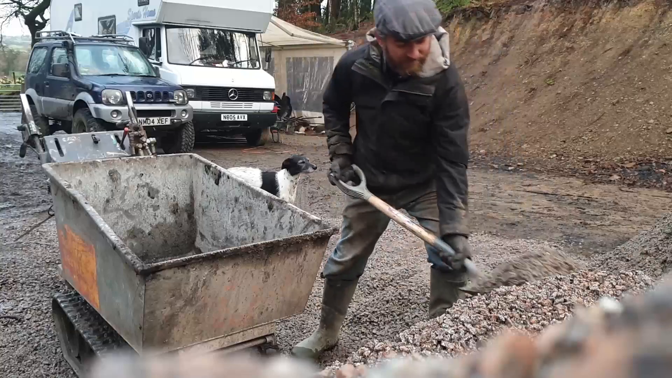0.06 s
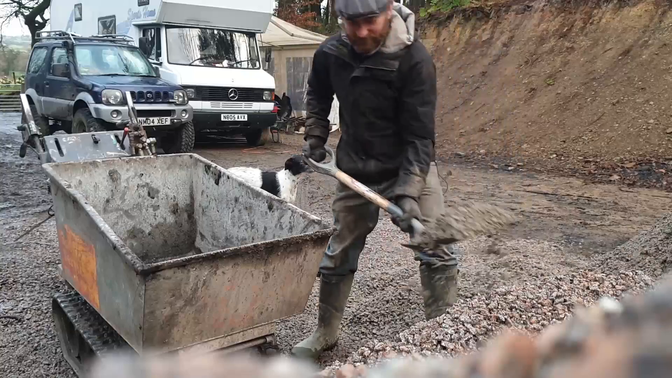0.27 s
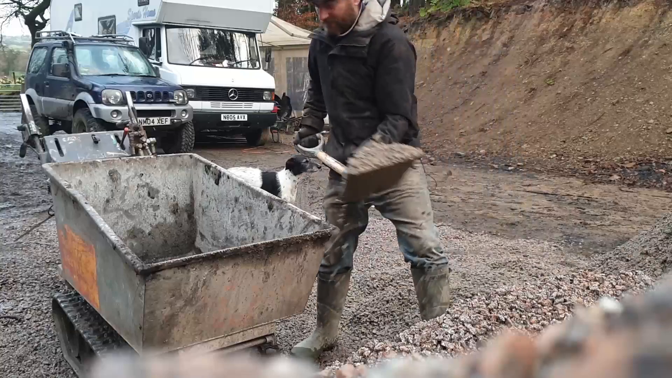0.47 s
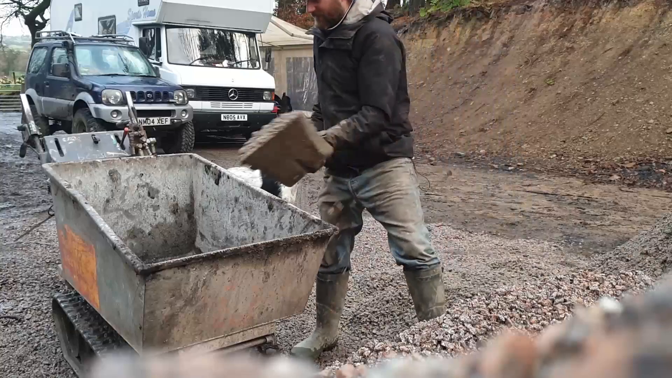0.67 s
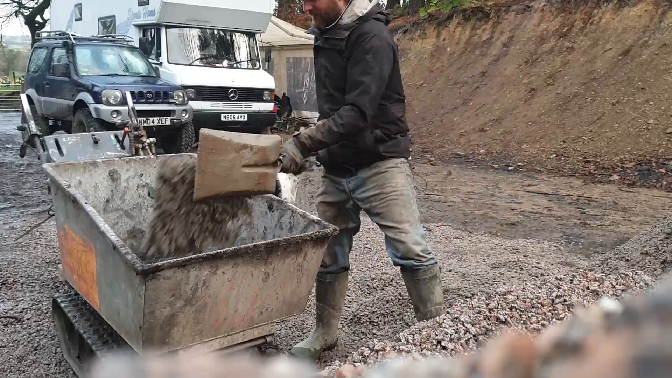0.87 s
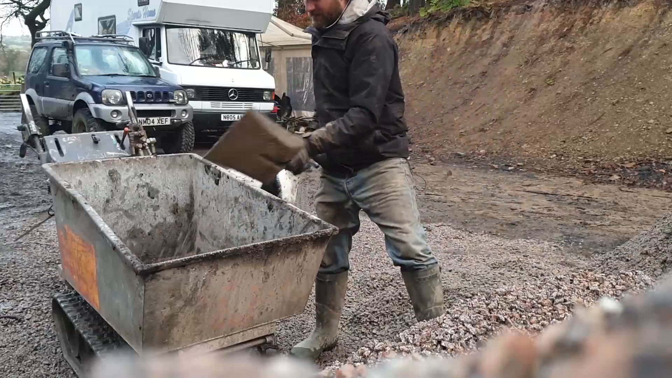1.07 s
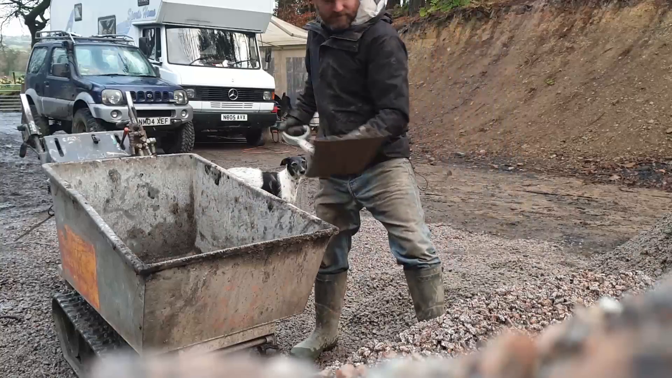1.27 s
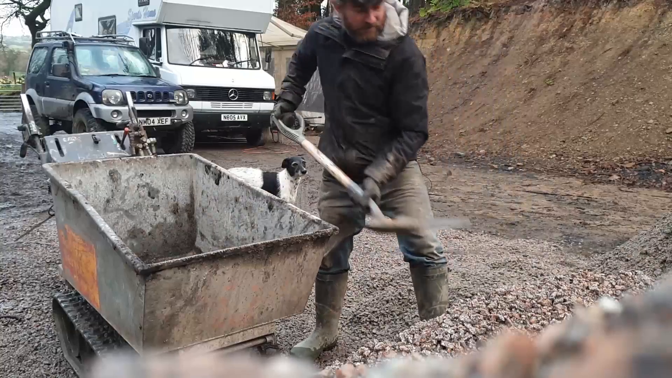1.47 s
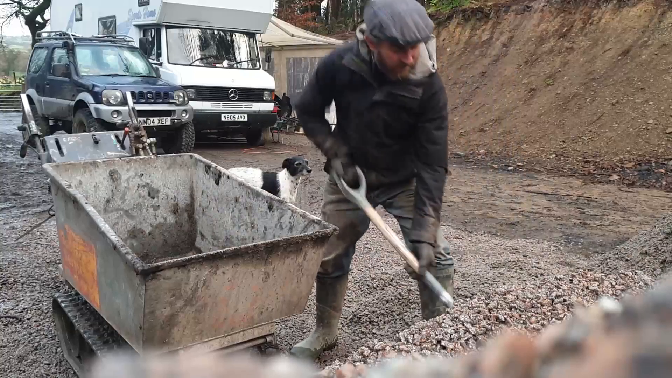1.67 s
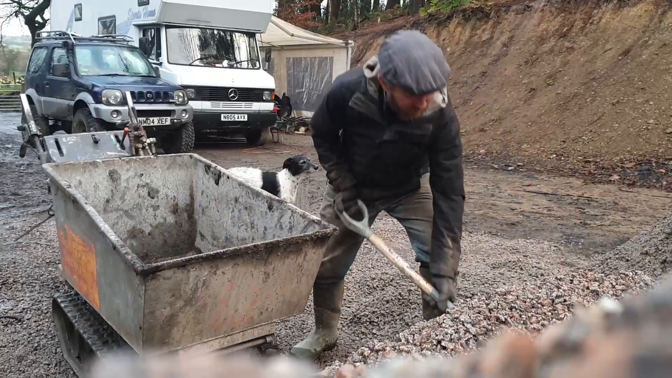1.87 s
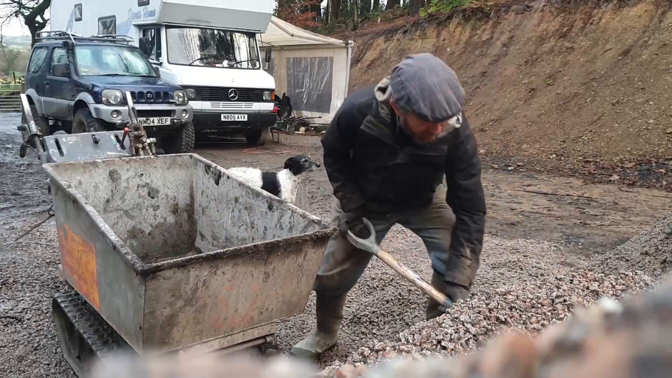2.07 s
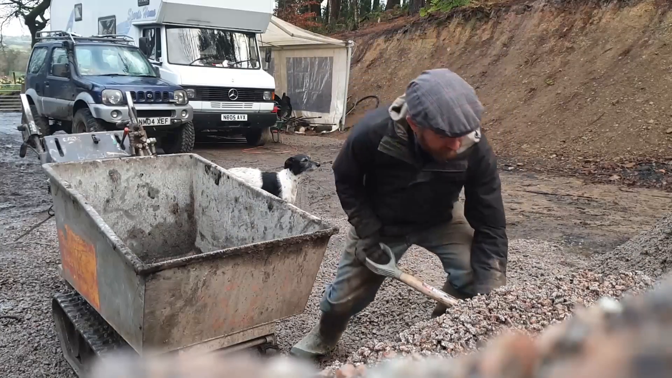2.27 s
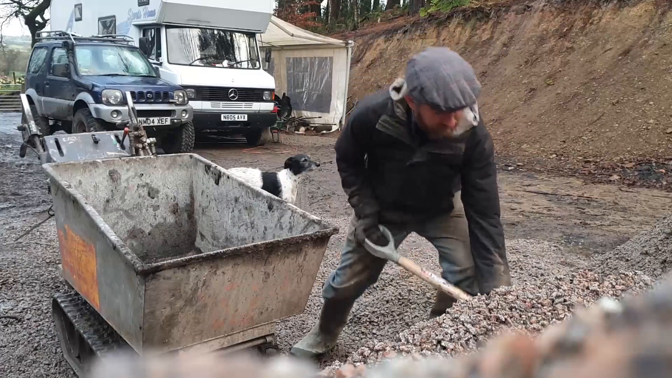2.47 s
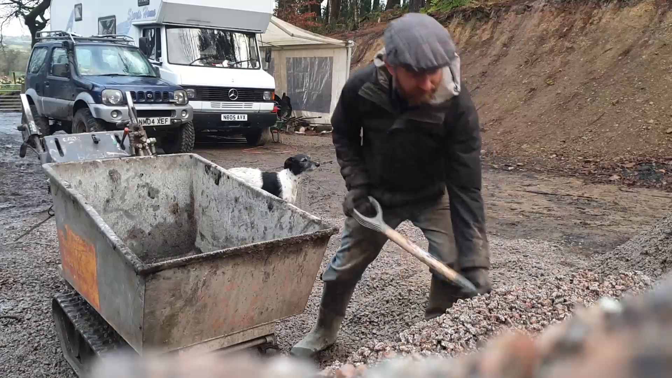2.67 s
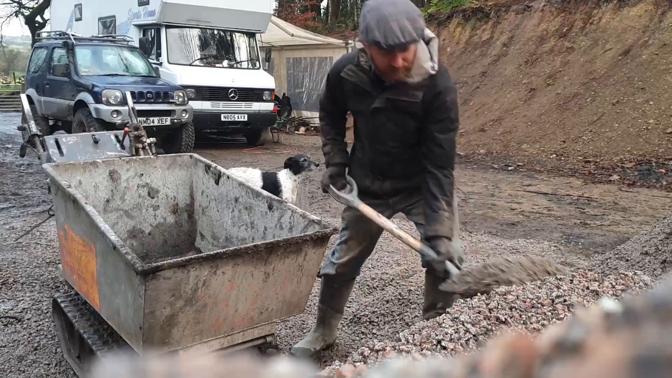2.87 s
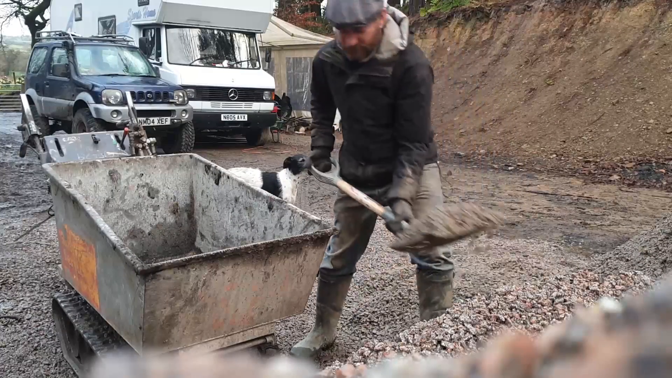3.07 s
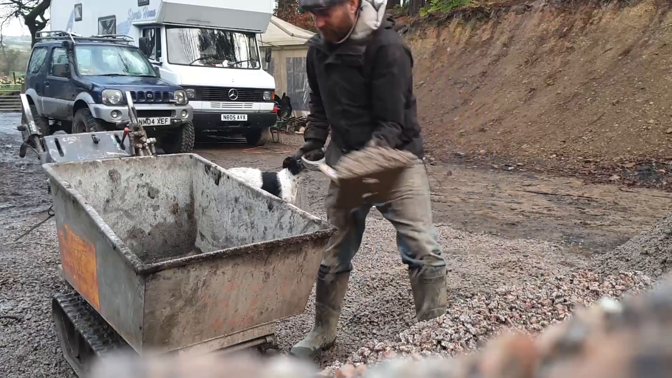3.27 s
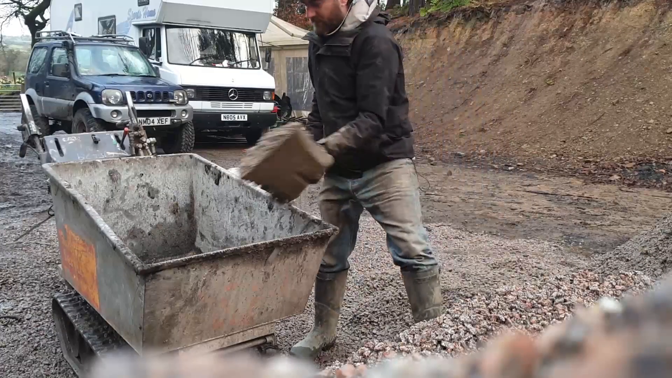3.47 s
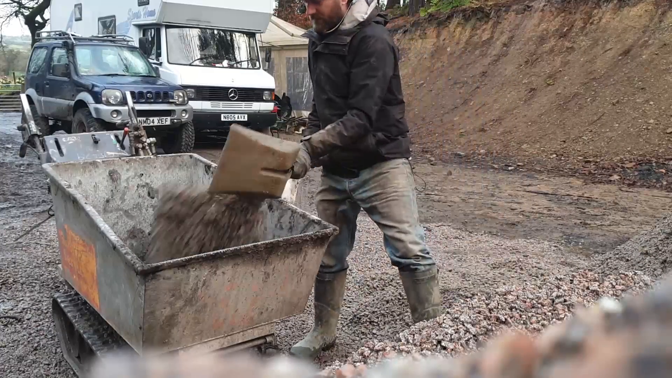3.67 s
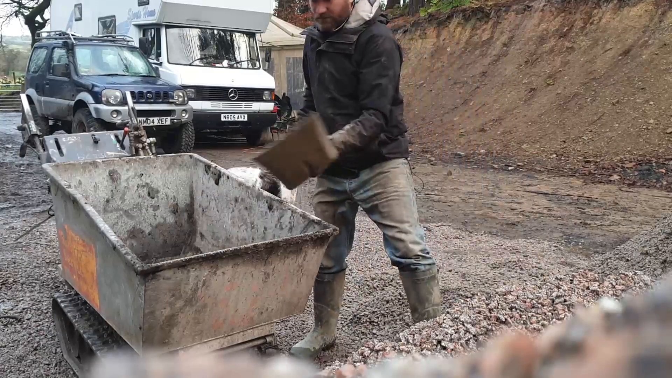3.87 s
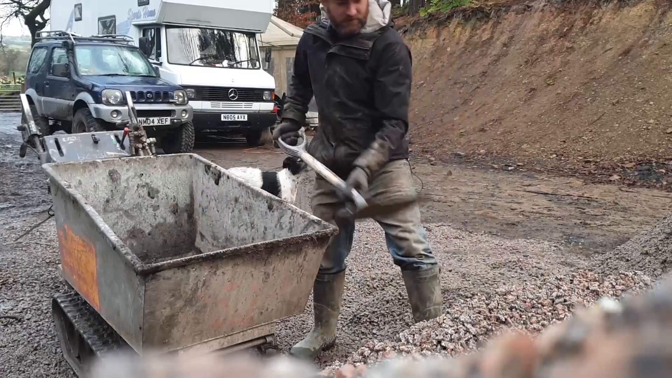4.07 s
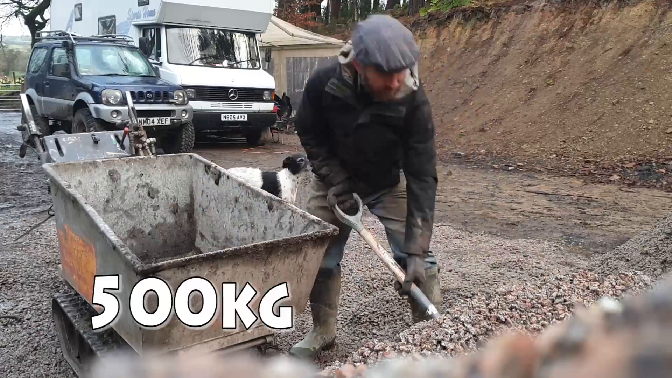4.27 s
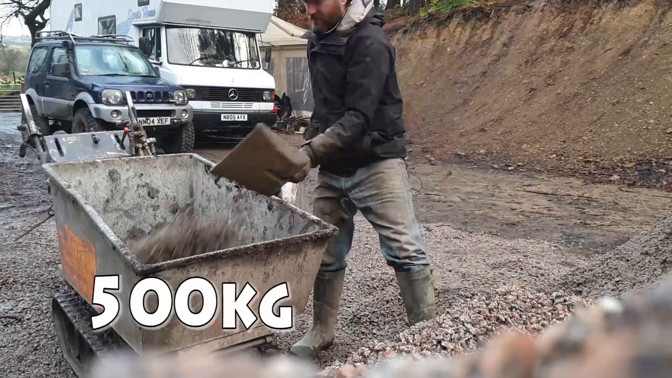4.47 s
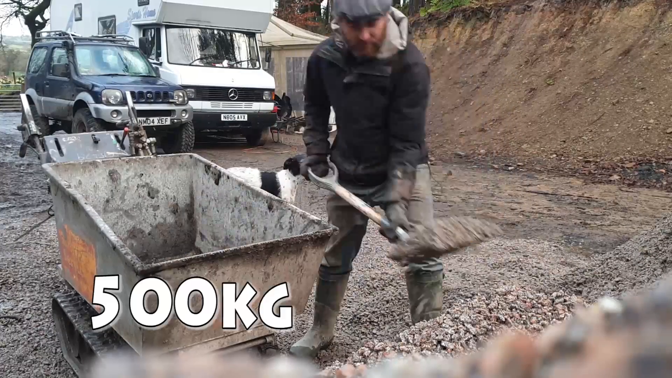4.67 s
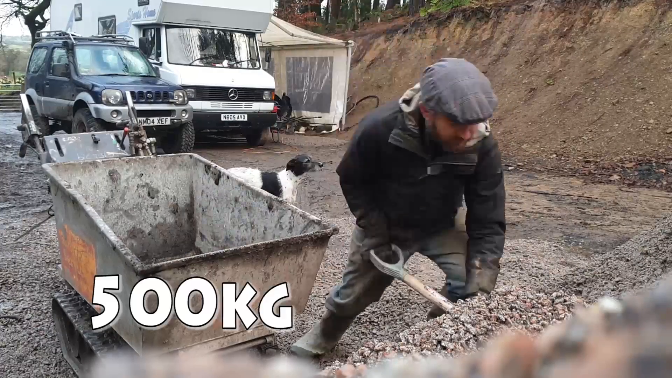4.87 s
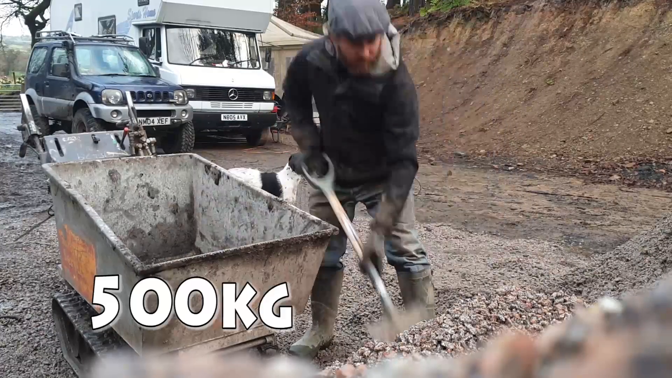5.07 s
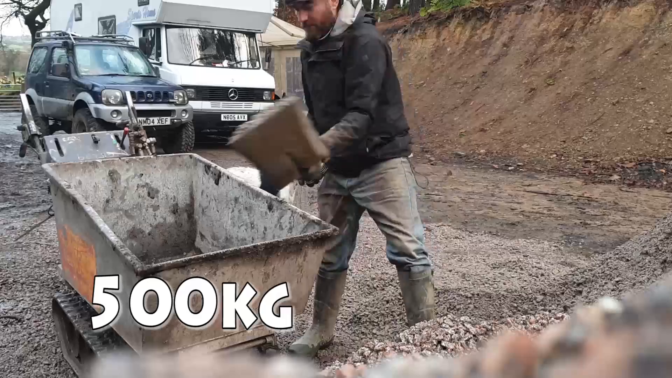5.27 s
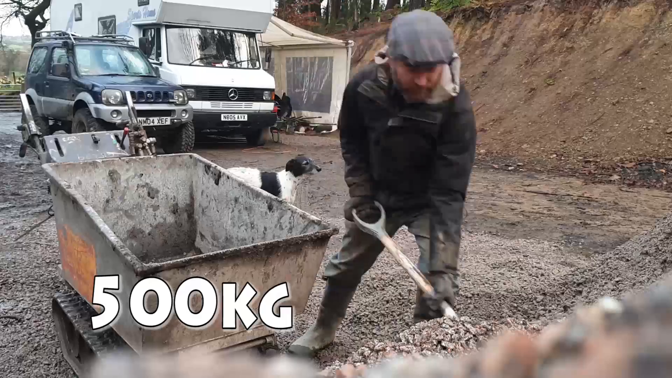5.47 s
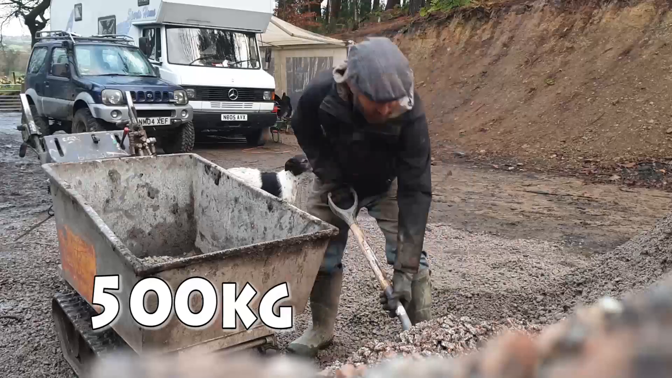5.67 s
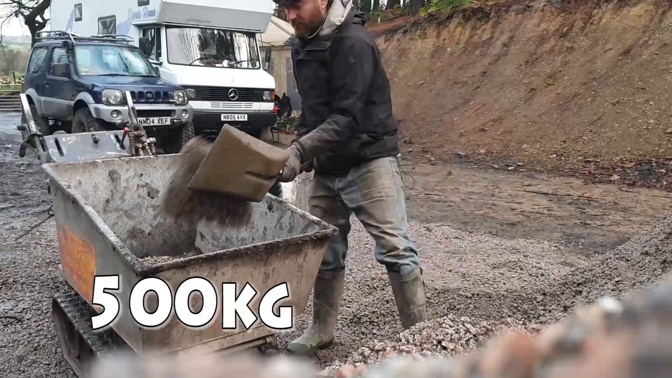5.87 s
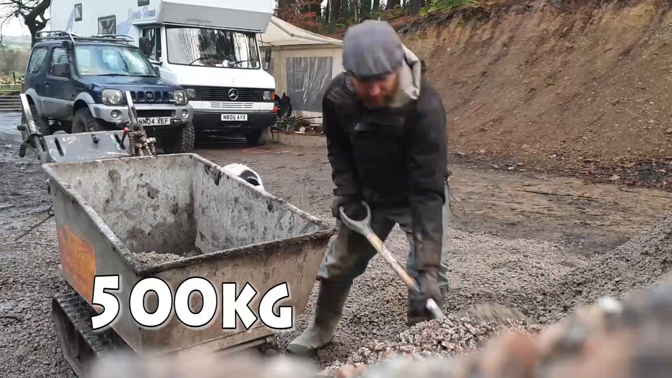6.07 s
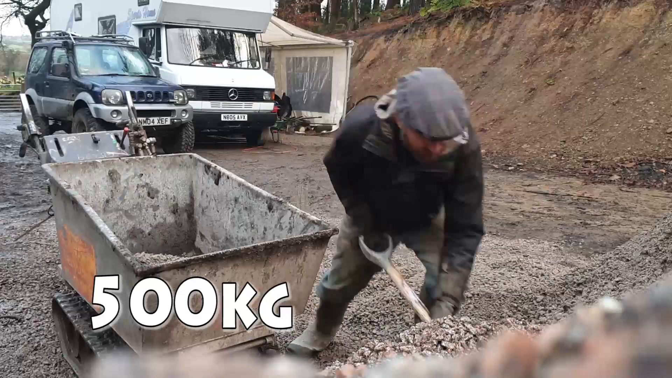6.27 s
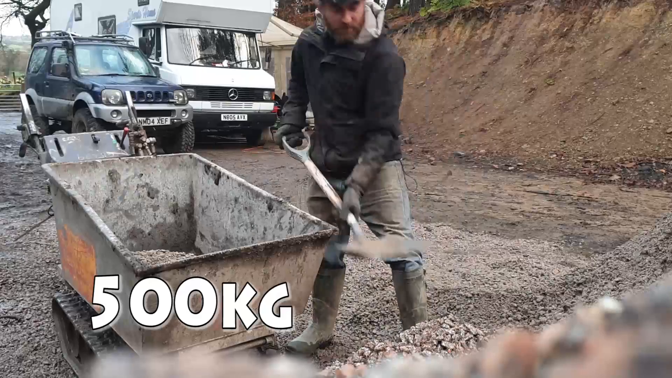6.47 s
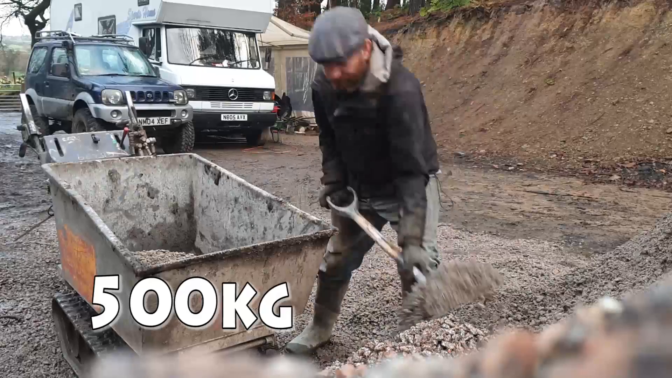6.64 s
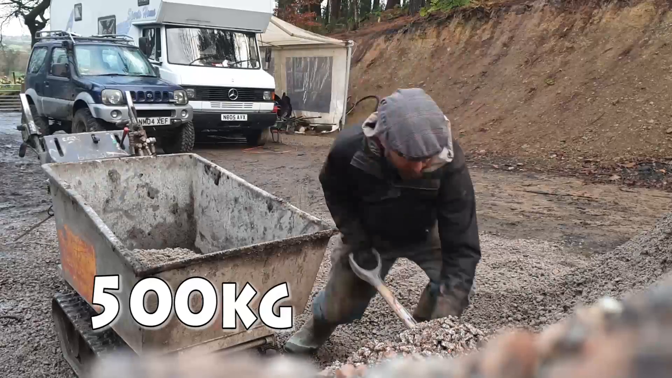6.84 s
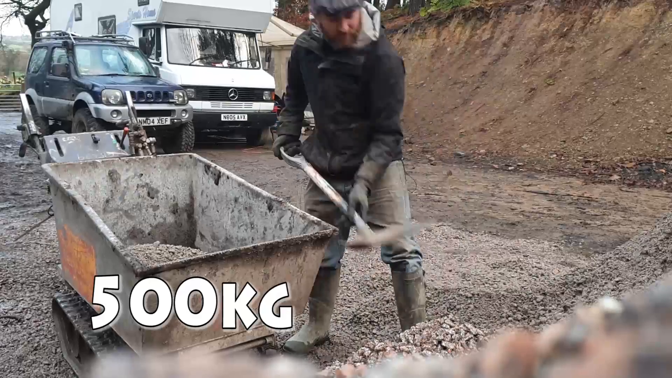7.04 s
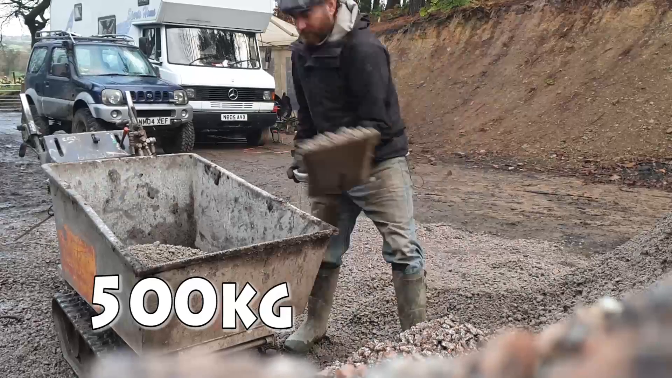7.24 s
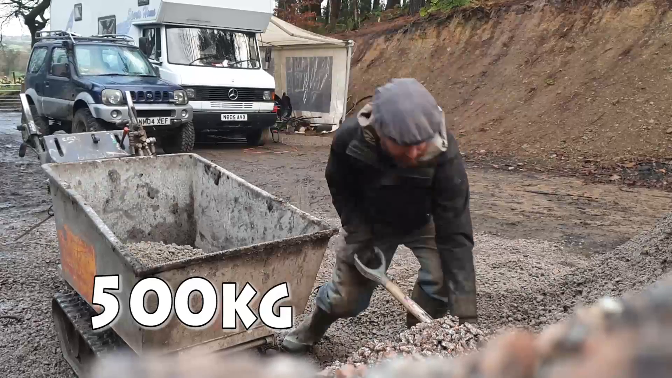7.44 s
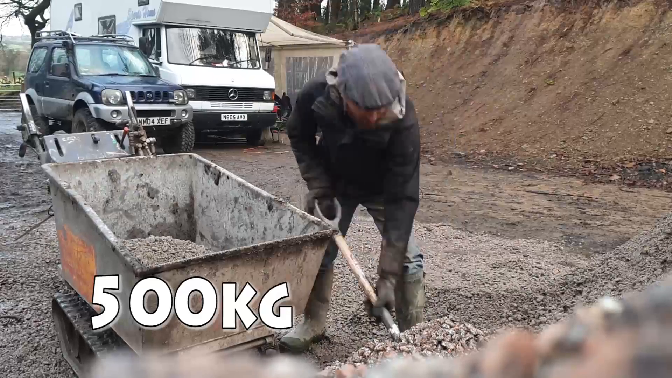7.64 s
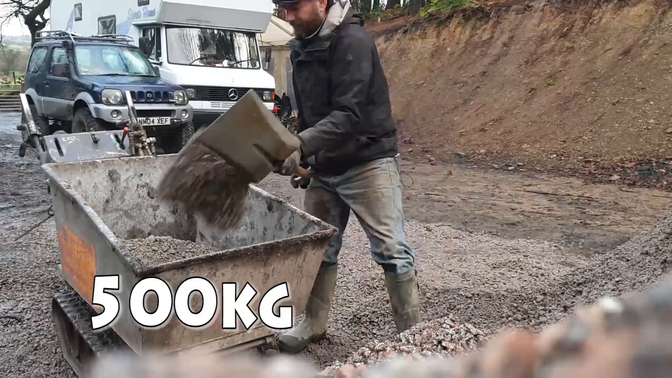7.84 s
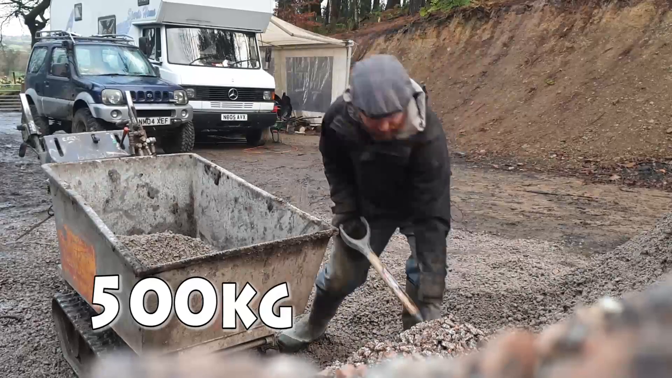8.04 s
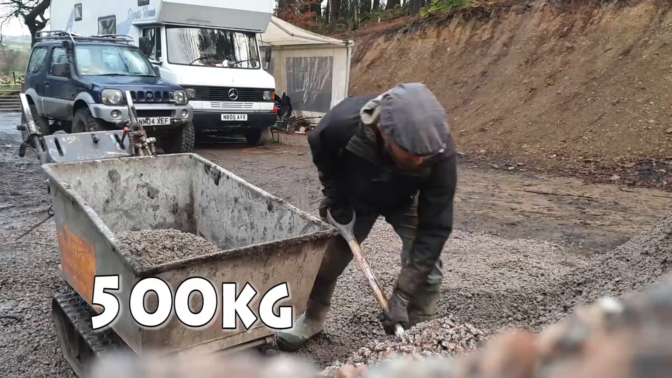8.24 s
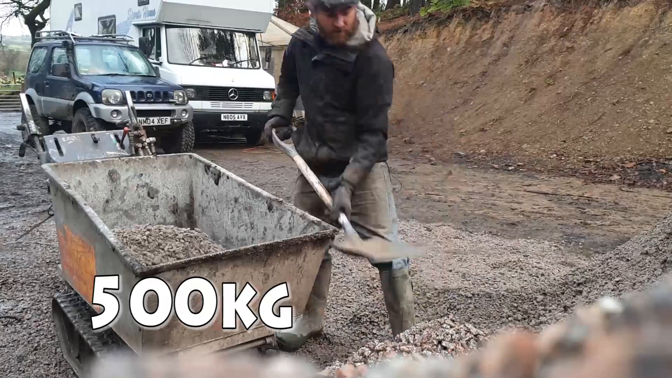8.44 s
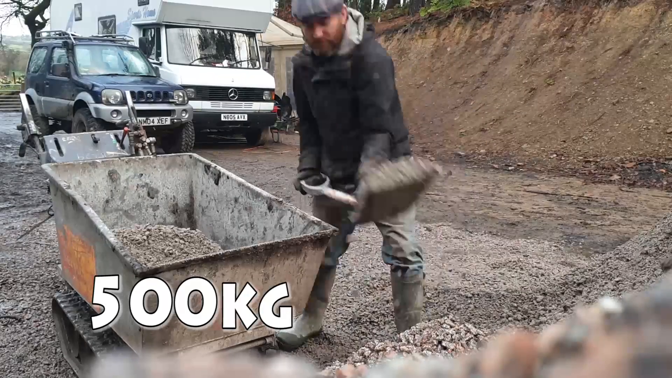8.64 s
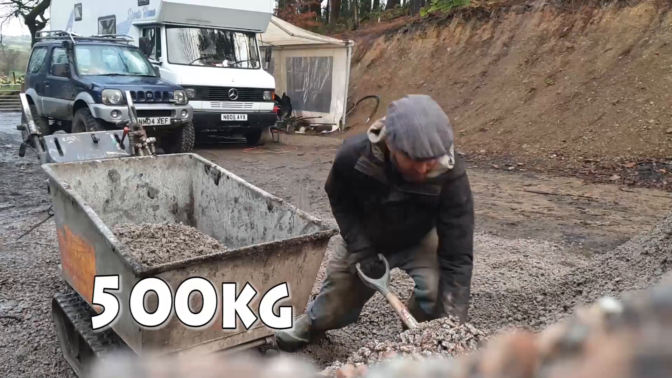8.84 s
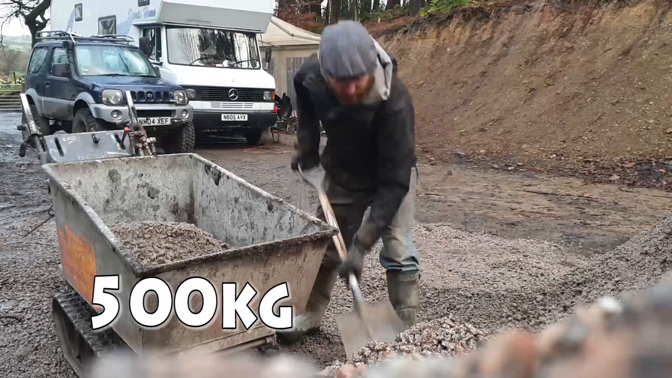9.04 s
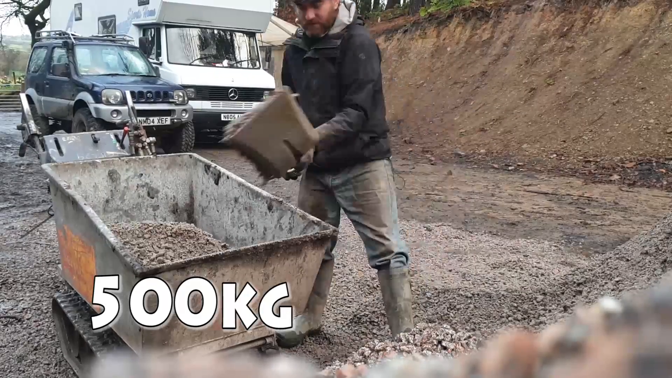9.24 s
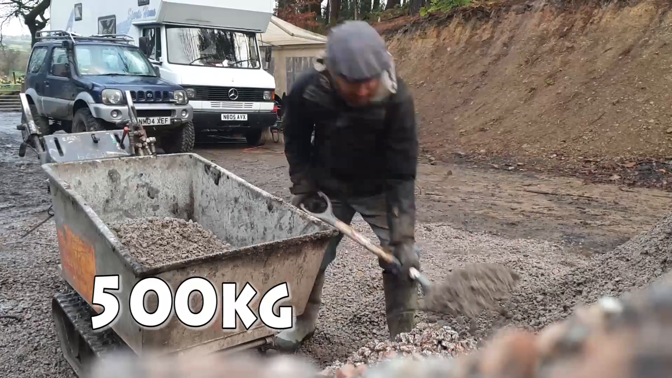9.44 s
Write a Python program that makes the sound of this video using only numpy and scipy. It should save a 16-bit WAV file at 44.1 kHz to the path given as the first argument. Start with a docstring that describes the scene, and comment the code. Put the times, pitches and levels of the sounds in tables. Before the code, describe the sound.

Outdoors, close stereo, with a soft distant traffic hum and fine grit trickling throughout. At about 0.5 s dull blade knocks sound, then at 1.0 s a load of gravel crashes into a steel skip, drumming its walls with a hollow ring that fades over loose stones. At 1.7 s the blade stabs the pile with a knock, and a gritty grinding push runs from 2.0 to 2.4 s. After a quieter pause, bright ticks fall around 3.3 s and a second load slams the skip at 3.75 s, settling by 4.2 s. From 4.3 s the strokes become about tenfold faster: crisp stab, short scrape, dry rattle and landing, roughly every 0.28 s, thinner and further left from 5 s, with a strong clack near 5.4 s. Later spills soften. From 8 s low wind buffets, with thumping puffs left at 8.6-8.9 s, then gusts right around 9.3 s until the end at 9.5 s.

```python
"""Far traffic hums and grit trickles throughout: shaped noise with wandering gains.
Gravel is shovelled from a pile into a steel skip, twice at working pace, then about tenfold faster.
In a stroke the blade stabs and pushes through the pile, then stones rattle off it and land: noise bursts.
Decaying sines give the knocks of the blade and the ring of the skip under the working-pace loads.
Near the end, wind buffets left and right: low noise with a few single puffs on the left."""
import sys
import numpy as np
from scipy import signal
from scipy.fft import rfft, irfft
from scipy.io import wavfile
from scipy.ndimage import uniform_filter1d

SR = 44100
rng = np.random.default_rng(int(sys.argv[2]) if len(sys.argv) > 2 else 0)


def put_to_file(sound):
    """Save the sound as 16-bit audio at rate SR, in the file named by the first command-line argument."""
    columns = np.atleast_2d(sound).T  # one column per channel
    safe = np.clip(columns, -1, 1)
    whole_steps = np.round(safe * 32767)
    wavfile.write(sys.argv[1], SR, whole_steps.astype(np.int16))


N = 419258
T = np.arange(N) / SR

# Levels in the tables are relative within their layer.
# traffic spectrum: (frequency [Hz], density [dB])
HUM_SPECTRUM = [(15, -35), (40, -10.5), (65, -5), (85, -7), (110, -13), (500, -24), (900, -23),
                (2000, -51.5), (3000, -85.5)]
# trickling grit, continuous: (time [s], level [dB])
TRICKLE = [(0.0, -57), (1.24, -60.5), (1.53, -65.5), (5.45, -59), (9.51, -64)]
# grains ticking off the lifted blade: (time [s], level [dB])
TICKS = [(3.1273, -49), (3.253, -49), (3.3364, -31), (3.386, -43), (3.4263, -33), (3.454, -34)]
# grit spectrum: (frequency [Hz], density [dB])
GRIT_SPECTRUM = [(900, -25.5), (1600, -9.5), (2500, -12.5), (4200, -9.5), (5200, -7), (12500, -4.5),
                 (16000, -4)]
# blade grinding through the pile at working pace: (start [s], length [s], level [dB], body [dB])
GRINDS = [(0.375, 0.26, -77.5, 13), (1.694, 0.1, -44, -1), (1.974, 0.44, -48.5, 5.5)]
# loose stones dropping alone: (time [s], level [dB], fizz [dB])
STRAYS = [(0.504, -56.5, 9.5), (0.808, -52, 1), (0.879, -38.5, -13), (1.358, -49, -16), (1.472, -48, -10),
          (1.6, -52, -28), (1.885, -52, -1.5), (3.659, -47, -3.5), (4.513, -35, -20), (4.784, -37.5, -5),
          (5.03, -41.5, -4), (5.345, -34, -6), (5.892, -56, 17.5), (6.169, -43.5, 6), (6.206, -42, 8),
          (6.746, -37, 5.5), (8.166, -42, 2)]
# working-pace loads hitting steel: (time [s], level [dB], rise [ms per 9 dB], fall [ms per 9 dB])
LOADS = [(0.628, -37.5, 7.5, 22), (0.97, -23.5, 1.7, 28), (1.005, -15.5, 14.5, 43.5), (3.535, -34, 8.5, 22),
         (3.739, -35, 6, 36), (3.769, -17, 2.5, 19), (3.831, -20, 13.5, 22), (4.111, -32, 9, 18)]
# blade stabbing the pile: (time [s], level [dB], fall [ms per 9 dB])
STABS = [(1.687, -27, 19), (4.316, -35, 2), (4.59, -27, 2), (4.865, -24, 3), (5.134, -22.5, 4),
         (5.417, -26.5, 5.5), (5.699, -20, 3.5), (6.001, -27.5, 6.5), (6.271, -23, 4.5), (6.54, -24.5, 5),
         (6.82, -28.5, 8), (7.11, -28.5, 5), (7.385, -21.5, 3.5), (7.668, -23.5, 6), (7.956, -23.5, 6.5),
         (8.241, -31, 8), (8.507, -26, 6.5), (8.788, -26, 8.5), (9.085, -26.5, 3.5), (9.354, -26, 4.5)]
# hurried pushes through the pile: (start [s], nominal length [ms], level [dB])
PUSHES = [(4.353, 29, -44), (4.619, 39.4, -39), (4.898, 37.3, -36), (5.172, 36.6, -33.5),
          (5.446, 47, -36.5), (5.739, 51, -38.5), (6.037, 43.6, -37), (6.303, 36.3, -34), (6.578, 50, -39),
          (6.854, 41.6, -38.5), (7.14, 43, -39.5), (7.421, 43.5, -37), (7.701, 48, -36), (7.998, 39, -34.5),
          (8.276, 40.5, -35.5), (8.541, 60, -38), (8.829, 42.3, -36.5), (9.133, 22.2, -38.5),
          (9.38, 38.5, -39)]
# hurried loads sliding off the blade: (time [s], level [dB], fall [ms per 9 dB])
SLIDES = [(4.537, -24.5, 5), (4.812, -31.5, 8), (5.081, -24, 7.5), (5.364, -19.5, 3.5), (5.647, -21, 4.5),
          (5.944, -22.5, 6.5), (6.227, -32.5, 3.5), (6.499, -36, 10), (6.771, -37.5, 5), (7.054, -37, 7),
          (7.336, -29, 4.5), (7.615, -37, 15.5), (7.899, -34.5, 8.5), (8.191, -37, 8), (8.457, -43, 7),
          (8.734, -38.5, 9.5), (9.025, -32.5, 2.5), (9.304, -43.5, 13)]
# hurried loads landing, at times in two heaps: (time [s], level [dB], fall [ms per 9 dB])
LANDINGS = [(4.572, -30, 2.1), (4.843, -30.5, 2.5), (5.109, -25, 3), (5.394, -13.5, 2), (5.675, -26.5, 3),
            (5.97, -27.5, 6.5), (6.24, -26.5, 8), (6.523, -34, 8), (6.779, -26.5, 1), (6.789, -27.5, 5),
            (7.071, -33, 12), (7.358, -29, 3.5), (7.637, -30.5, 8.5), (7.922, -30, 7.5), (8.219, -34.5, 9),
            (8.466, -36.5, 12.5), (8.481, -30, 5), (8.748, -34, 10), (8.762, -28, 4), (9.04, -41, 6)]
# gravel spectrum: (frequency [Hz], density [dB])
STONE_SPECTRUM = [(70, -38), (160, -17.5), (250, -1.5), (550, 2.5), (2400, -5), (3800, -2), (8900, -13.5),
                  (14900, -12.5)]
# knocks and rings of blade and handle: (time [s], frequency [Hz], level [dB], t60 [s])
BLADE_RINGS = [(.45, 292, -40, 0.28), (.52, 202, -24.5, 0.088), (.52, 300, -29, 0.097),
               (.52, 420, -30.5, 0.076), (.63, 244, -43, 1.8), (1.686, 405, -27.5, 0.09),
               (1.688, 724, -33, 0.094), (3.54, 241, -46, 3), (4.505, 158, -30.5, 0.16),
               (4.584, 181, -27.5, 0.06)]
# clear modes of the skip: (frequency [Hz], level [dB], t60 [s])
SKIP_MODES = [(194.4, -12.5, 2.1), (205, -13, .9), (213, -11.5, 0.34), (302, -14, .3), (425, -8.5, 0.41),
              (565, -6.5, 0.2), (1980, -15.5, 0.27)]
# curve for the crowd of close skip modes: (frequency [Hz], level [dB], t60 [s])
WALL_MODES = [(175.4, -24, 0.34), (250, -16, 1), (633, -11, 0.39), (1200, 3, 0.1), (2504, -11, 0.099)]
# wind: (time [s], level [dB], left minus right [dB])
WIND = [(7.4, -51.5, -3), (8.0, -39.5, 6.5), (8.35, -38.5, 7.5), (8.85, -34, 8), (9.08, -55.5, -11),
        (9.28, -33.5, -10), (9.45, -38, -8), (9.51, -59, -14)]
# wind spectrum: (frequency [Hz], density [dB])
GUST_SPECTRUM = [(15, -46), (30, -3), (76, -1), (225, -14), (400, -24.5), (700, -84)]
# puffs on the left: (time [s], level [dB], frequency at centre [Hz], width [cycles])
PUFFS = [(8.643, -14.5, 59.6, 0.22), (8.715, -12.5, 67, 0.32), (8.906, -11.5, 106, 0.71)]
# left-right likeness at working pace: (frequency [Hz], correlation [-1 to 1])
LIKENESS = [(60, 0.98), (290, 0.85), (640, 0.36), (1400, 0.4), (3100, -0.34), (7000, 0.21), (15000, -0.34)]
# place of the work, scaled by each layer: (time [s], left minus right [dB])
PAN = [(0, 2.5), (4.97, 3.5), (5.0, 8.5), (8.95, 9), (8.99, 1.5), (9.51, 1.5)]

HURRY_S, UNPAIR_S = 4.45, 0.059  # work speeds up; the sides lose their likeness over UNPAIR_S
BAND_LIMIT_HZ = 15900
HUM_DB, HUM_HURRIED_DB, HUM_SWELL_DB = -52.5, 2.7, 1.3
STAB_RISE_MS = 1.12
SLIDE_RISE, LANDING_RISE = 0.67, 1.29  # shares of the fall
STRAY_MS, HURRIED_STRAY_MS = (11, 22), (1.9, 8.1)  # rise, fall per 9 dB
STAB_FIZZ_DB, SLIDE_FIZZ_DB, PUSH_FIZZ_DB = -20, -23.5, -48.5
FIZZ_FOLLOWS = 0.38  # fine grit hardly follows the force of the blow
FIZZ_PER_PAN = 0.81  # treble gain [dB] per dB that the work sits further left
LANDING_FIZZ_DB, GRIND_FIZZ_DB = -6.5, -5  # against the table level
LOAD_BODY_DB, LOAD_FIZZ_DB, LOAD_DRUM_DB = -9, -7.5, -4.5  # against the table level
SETTLE_DB, SETTLE_LONGER = (-6.5, -14, -14.5, -3.5), 2.86  # body, crunch, fizz, drum; times the fall
LEAD_MS, LEAD_DB, LEAD_FIZZ_DB = 50, -54.5, 8  # grit spills before each hurried slide
SLUMP_MS, SLUMP_DB, SLUMP_FIZZ_DB = 34, -18, -56  # pile slumps after each hurried push
GRIND_SMOOTH = .8  # share of the knocking that a steady grind irons out
PUFF_GLIDE = 0.53  # a puff speeds up as it passes


def gain_of(db):
    """Amplitude ratio for a level in dB."""
    return 10 ** (np.asarray(db) / 20)


def evened(x):
    """Scales to mean power 1."""
    return x / np.sqrt(np.mean(x ** 2) + 1e-20)


def read(points, hz):
    """Reads a curve along log frequency."""
    f, value = np.transpose(points)
    return np.interp(np.log(hz + 1), np.log(f + 1), value)


def add(mix, s, sound):
    """Adds a sound in place from time s, cut at the end."""
    part = mix[..., round(s * SR):][..., :sound.shape[-1]]
    part += sound[..., :part.shape[-1]]


def paired(shape):
    """Two-sided noise of a given magnitude over Hz; the sides are alike only at working pace."""
    hz = np.fft.rfftfreq(N, 1 / SR)
    left, other = rfft(rng.standard_normal((2, N))) * shape(hz)
    same = np.clip(read(LIKENESS, hz), -1, 1)
    alike = same * left + np.sqrt(1 - same ** 2) * other
    left, alike, other = (evened(irfft(z, N)) for z in (left, alike, other))
    turn = np.pi / 2 * np.clip((T - HURRY_S) / UNPAIR_S, 0, 1)
    return np.array([left, np.cos(turn) * alike + np.sin(turn) * other])


def lumps(ms, depth_db):
    """A gain that wanders at random, of mean power 1."""
    size = max(round(ms * SR / 1000), 1)
    wander = uniform_filter1d(rng.standard_normal(N), size)
    wander = evened(uniform_filter1d(wander, size))
    return evened(gain_of(depth_db * wander))


def panned(share):
    """Left and right gains of constant summed power, at a share of PAN."""
    right = gain_of(-share * np.interp(T, *np.transpose(PAN)))
    return np.array([np.ones(N), right]) * np.sqrt(4 / (1 + right ** 2))


def traffic():
    """A far hum that swells a little, louder once the work is hurried."""
    level = gain_of(HUM_DB + HUM_HURRIED_DB * (T > HURRY_S))
    level = level * lumps(300, HUM_SWELL_DB) * lumps(29, 2.8)
    return level * paired(lambda hz: gain_of(read(HUM_SPECTRUM, hz))) * panned(0.19)


def grit():
    """Trickling grit: a thin hiss with scattered bright ticks that die within ms."""
    level = gain_of(np.interp(T, *np.transpose(TRICKLE))) * lumps(12, 2.1)
    t = np.arange(400) / SR
    for s, db in TICKS:
        add(level, s, gain_of(db - 14 - 60 * t / 0.018))
    return level * panned(1.0) * paired(lambda hz: gain_of(read(GRIT_SPECTRUM, hz)))


def fizz_of(s, db, usual_db):
    """Fizz against the blow: near its usual level whatever the force, brighter on the left."""
    pan_db = np.interp(s, *np.transpose(PAN))
    return (1 - FIZZ_FOLLOWS) * (usual_db - db) + FIZZ_PER_PAN * (pan_db - 7.5)


def burst(power, s, db, rise_ms, fall_ms, fizz_db, body_db, drum_db=-120, late_db=(-15.5,), longer=3.62):
    """Adds one burst of collisions: a rise, a fall, and stragglers that die more slowly."""
    rise_ms, fall_ms = max(rise_ms, .5), max(fall_ms, .5)
    ms = np.arange(-5 * rise_ms, 600, 1000 / SR)
    shape = gain_of(np.where(ms < 0, 9 * ms / rise_ms, -9 * ms / fall_ms)) ** 2
    late_curve_db = np.array(late_db)[:, None] - 9 * ms / (longer * fall_ms)
    stragglers = (ms > 0) * gain_of(late_curve_db) ** 2
    bands = gain_of(db + np.array([[body_db], [-2.5], [fizz_db], [drum_db]])) ** 2
    add(power, s + ms[0] / 1000, bands * (shape + stragglers))


def body_of(s):
    """Body against the blow [dB]: rattles are thinner from 5 s on."""
    return -2.5 if s < 5 else -9


def grinds(power):
    """Adds steady grinding through the pile; the treble swells last."""
    for s, length_s, db, body_db in GRINDS:
        swell = np.hanning(round(length_s * SR)) ** np.array([[1.6], [2.2], [3]])
        bands = gain_of(db + np.array([[body_db], [0], [GRIND_FIZZ_DB]])) ** 2
        add(power[:3], s, bands * swell)


def strays(power):
    """Adds loose stones, each a small burst, shorter when hurried."""
    for s, db, fizz_db in STRAYS:
        rise_ms, fall_ms = STRAY_MS if s < HURRY_S else HURRIED_STRAY_MS
        burst(power, s, db, rise_ms, fall_ms, fizz_db, body_of(s))


def loads(power):
    """Adds working-pace loads that drum the skip, then settle."""
    for s, db, rise_ms, fall_ms in LOADS:
        burst(power, s, db, rise_ms, fall_ms, LOAD_FIZZ_DB, LOAD_BODY_DB, LOAD_DRUM_DB,
              SETTLE_DB, SETTLE_LONGER)


def stabs(power):
    """Adds the sharp bite of the blade into the pile."""
    for s, db, ms in STABS:
        burst(power, s, db, STAB_RISE_MS, ms, fizz_of(s, db, STAB_FIZZ_DB), body_of(s) + 2.4)


def pushes(power):
    """Adds hurried pushes as smooth swells, each followed by a slump of the pile."""
    for s, ms, db in PUSHES:
        swell = signal.windows.tukey(round(1.404 * ms * SR / 1000), .9) ** 2
        bands = gain_of(db + np.array([[-2.5], [-1.1], [fizz_of(s, db, PUSH_FIZZ_DB)]])) ** 2
        add(power[:3], s - 0.21 * ms / 1000, bands * swell)
        burst(power, s + ms / 1000, db + SLUMP_DB, ms / 4, SLUMP_MS, SLUMP_FIZZ_DB, -0.5)


def slides(power):
    """Adds hurried loads sliding off the blade, each led by spilling grit."""
    for s, db, ms in SLIDES:
        burst(power, s, db, SLIDE_RISE * ms, ms, fizz_of(s, db, SLIDE_FIZZ_DB), body_of(s))
        burst(power, s, LEAD_DB, LEAD_MS, ms, LEAD_FIZZ_DB + fizz_of(s, 0, 0), -6)


def landings(power):
    """Adds hurried loads landing in the skip."""
    for s, db, ms in LANDINGS:
        burst(power, s, db, LANDING_RISE * ms, ms, LANDING_FIZZ_DB, body_of(s))


def strokes():
    """Collision power over time (body, crunch, fizz, drum on the walls) and how knocky it is."""
    power = np.zeros((4, N))
    for source in (strays, loads, stabs, pushes, slides, landings):
        source(power)
    sudden = power[1].copy()
    grinds(power)
    return power, 1 - GRIND_SMOOTH * (1 - sudden / (power[1] + 1e-12))


def mottled(x, depth_db):
    """Each clump of stones has its own colour: random patches some 800 Hz wide and 10 ms long."""
    z = signal.stft(x, nperseg=256, noverlap=192)[2]
    patches = uniform_filter1d(rng.standard_normal(z.shape[1:]), size=5, axis=0)
    patches = evened(uniform_filter1d(patches, size=8, axis=1))
    z = z * evened(gain_of(depth_db * patches))
    return signal.istft(z, nperseg=256, noverlap=192)[1][:, :N]


def gravel():
    """Dense stone collisions as noise in three ranges; working-pace loads also drum the skip."""
    power, knocky = strokes()
    body, crunch, fizz, drum = np.sqrt(power)
    under = lambda hz, edge_hz: 1 / (1 + (hz / edge_hz) ** 6)
    stone = lambda hz: gain_of(read(STONE_SPECTRUM, hz))
    # big stones and clumps strike all ranges together
    knocks = (lumps(2.03, 1.3) * lumps(7.5, 1.51)) ** knocky
    low = paired(lambda hz: stone(hz) * np.sqrt(under(hz, 2200)))
    low = mottled(low, 3.26)
    mid = paired(lambda hz: stone(hz) * np.sqrt(under(hz, 8300) - under(hz, 1700)))
    mid = mottled(mid, 4.5) * lumps(0.52, 0.93)
    top = paired(lambda hz: stone(hz) * np.sqrt(1 - under(hz, 8500)))
    top = mottled(top, 2.5) * lumps(.3, 1.5)
    stones = panned(0.67) * body * low + panned(0.85) * crunch * mid + panned(1.2) * fizz * top
    return knocks * stones + skip(knocks * drum * rng.standard_normal(N))


def blade():
    """Blade and handle: dull knocks and faint low rings as decaying sines."""
    out, t = np.zeros(N), np.arange(SR // 2) / SR
    for s, hz, db, t60 in BLADE_RINGS:
        ends = np.minimum(t * hz / 1.25, 1) * np.minimum((t[-1] - t) * 10, 1)
        add(out, s, gain_of(db - 60 * t / t60) * np.sin(2 * np.pi * hz * t) * ends)
    return out


def skip(blows):
    """Sheet-steel walls ring with a few clear modes over a crowd of close ones."""
    t = np.arange(SR * 3 // 2) / SR
    f, db, t60 = np.transpose(WALL_MODES)
    crowd_hz = f[0] * (f[-1] / f[0]) ** rng.random(240)
    crowd = zip(crowd_hz, np.interp(crowd_hz, f, db) - 14.0, np.interp(crowd_hz, f, t60))
    modes = np.array([gain_of(level_db - 60 * t / decay_s) * np.sin(2 * np.pi * hz * t)
                      for hz, level_db, decay_s in [*SKIP_MODES, *crowd]])
    # each wall faces its own way
    angle = rng.uniform(-0.73, 1.0, len(modes))
    facing = np.cos(angle + np.pi / 4 * np.array([[.7], [1.3]]))
    low_cut = signal.butter(4, 175., "high", fs=SR, output="sos")
    ring = signal.sosfilt(low_cut, facing @ modes)
    return gain_of(-30.5) * signal.fftconvolve(blows[None], ring, axes=1)[:, :N]


def wind():
    """Lumpy low buffeting, unrelated left and right, and single puffs as short gliding sines."""
    s, db, pan_db = np.transpose(WIND)
    db, pan_db = np.interp(T, s, db, left=-120), np.interp(T, s, pan_db)
    sides = gain_of([db + pan_db / 2, db - pan_db / 2])
    sides = sides / np.sqrt(np.cosh(pan_db * np.log(10) / 20) / 2)  # summed power independent of pan
    out = sides * paired(lambda hz: gain_of(read(GUST_SPECTRUM, hz))) * [lumps(26, 9.3), lumps(18, 7.7)]
    for s, db, hz, cycles in PUFFS:
        turns = np.arange(-SR // 20, SR // 20) / SR * hz
        puff = np.sin(2 * np.pi * turns * (1 + PUFF_GLIDE * turns)) * np.exp(-(turns / cycles) ** 2)
        add(out[0], s - 1 / 20, gain_of(db) * puff)
    return out


def scene():
    """Sums the layers."""
    return traffic() + grit() + gravel() + blade() + wind()


def record(dry):
    """Limits the band with a linear-phase low-pass."""
    lowpass = signal.firwin(511, BAND_LIMIT_HZ, window=("kaiser", 9), fs=SR)
    return signal.oaconvolve(dry, lowpass[None], "same")


dry = scene()
out = record(dry)
put_to_file(out)
```